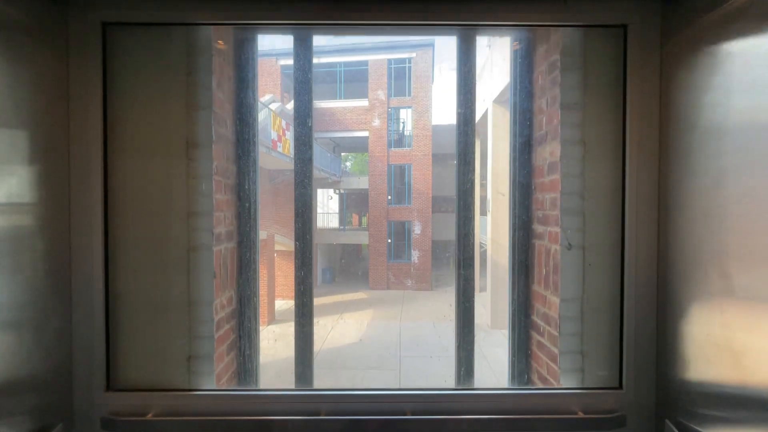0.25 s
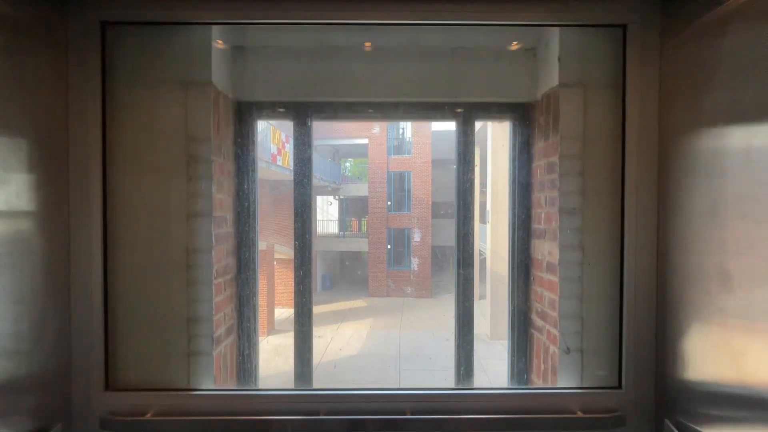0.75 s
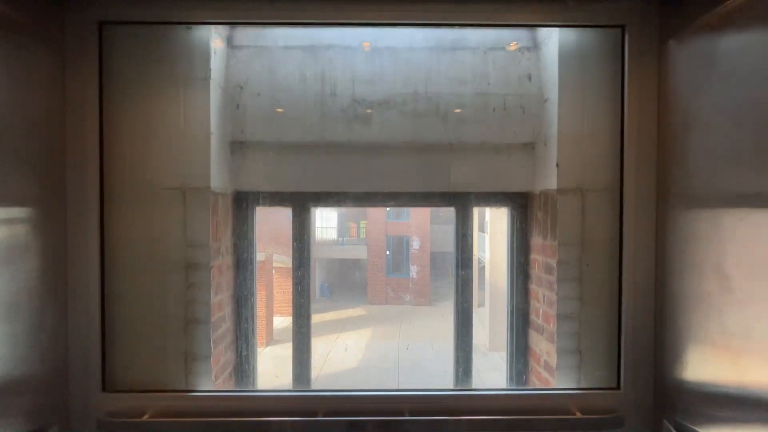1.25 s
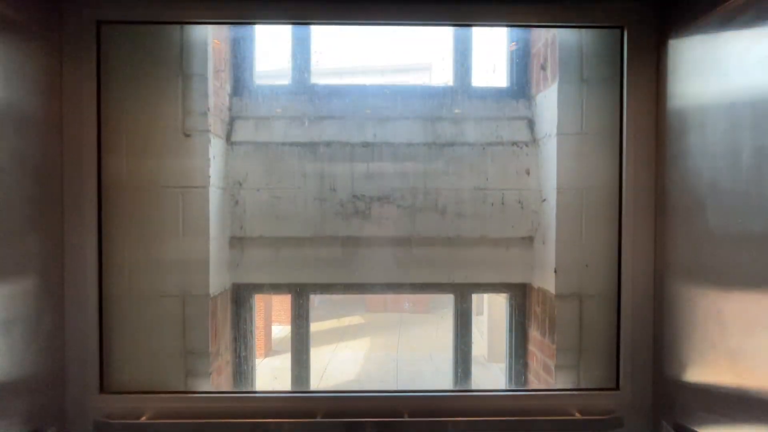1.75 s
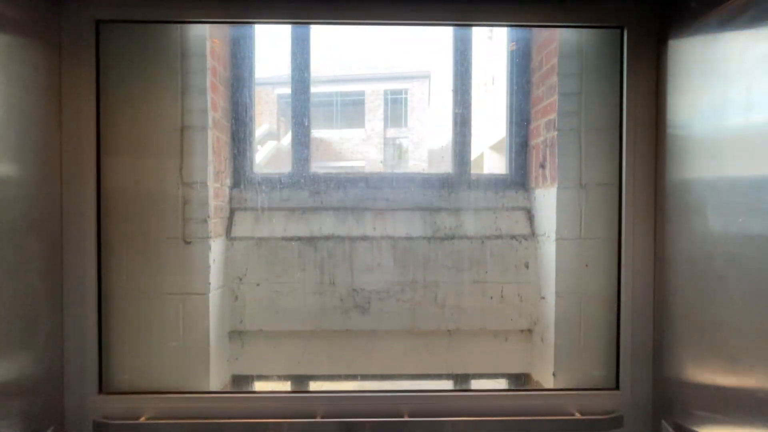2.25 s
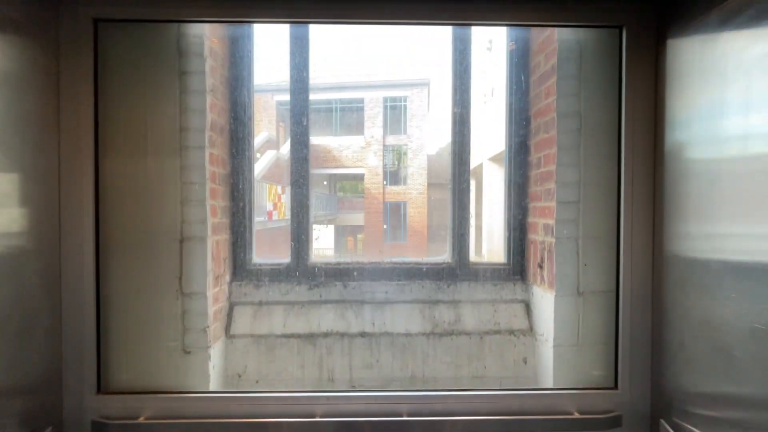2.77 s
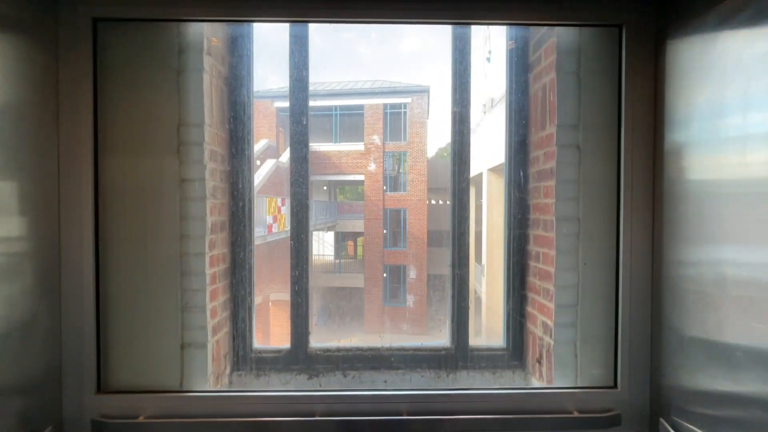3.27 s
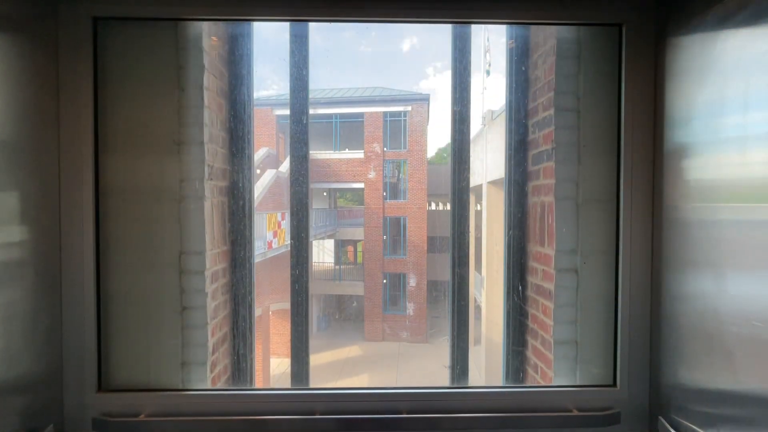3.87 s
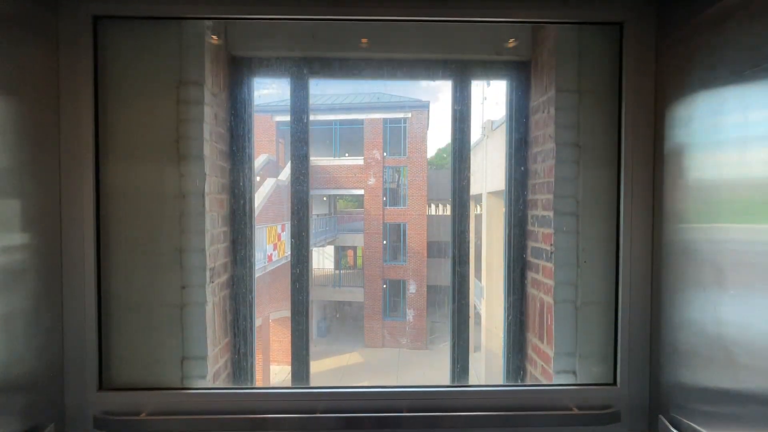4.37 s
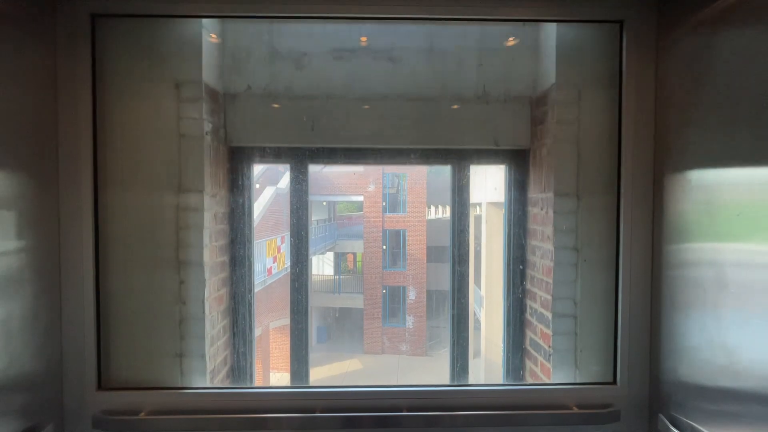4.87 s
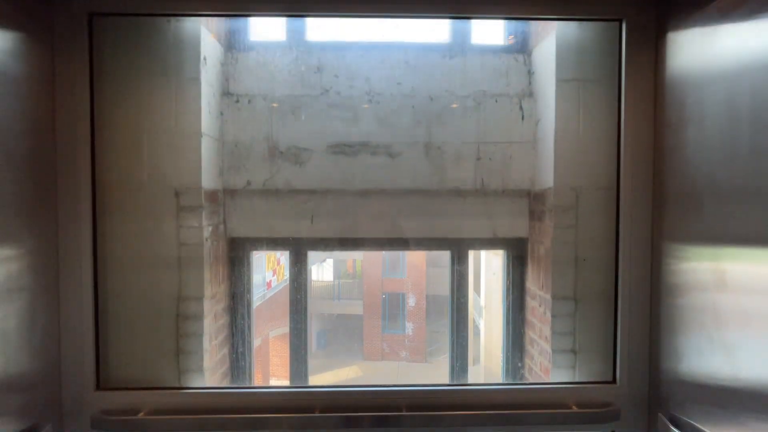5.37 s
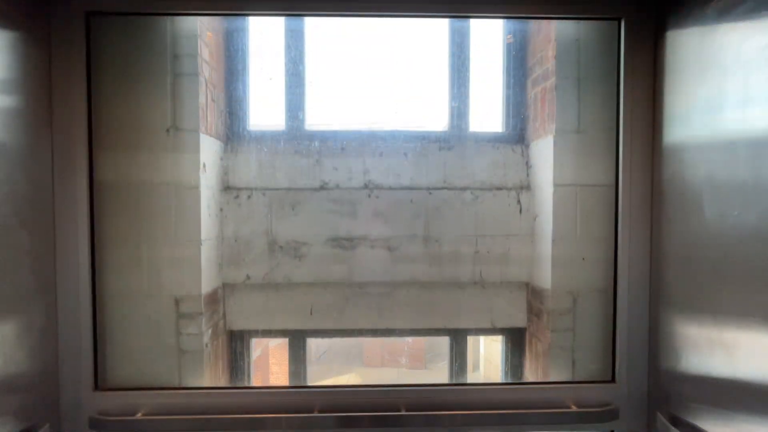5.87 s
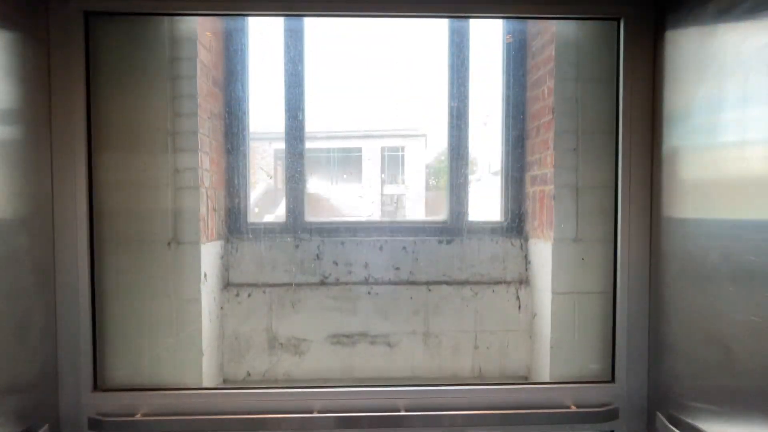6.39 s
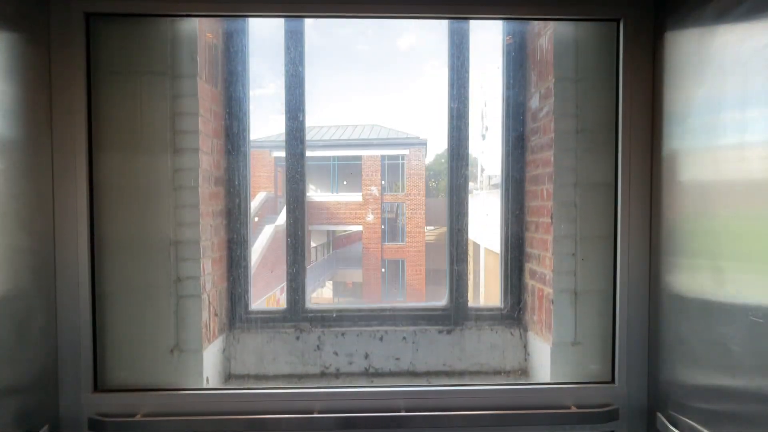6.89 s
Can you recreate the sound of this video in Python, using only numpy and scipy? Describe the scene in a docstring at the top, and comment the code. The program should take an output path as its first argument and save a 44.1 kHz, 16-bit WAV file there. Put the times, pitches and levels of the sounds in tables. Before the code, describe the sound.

From inside a rising lift, a deep rumble with soft, dull booms runs under the roar of the shaft and lightly ringing wall panels. A whir and a pulsing hiss sit on top, flaring briefly a few times and fading as the car climbs. Throughout, the pump's hum swells and recedes without changing pitch, joined by a low drone and faint, thin whistles.

```python
"""Hydraulic lift, going up

Inside the car as it rises through a concrete shaft. The screw pump hums on multiples of one pulse
rate, each swelling and fading as the car climbs through the shaft's standing waves. Under it the frame
drones, the body rumbles with soft booms, the shaft roars and wall panels ring. Faint whistles come and
go; a rasp and a throbbing hiss, perhaps oil rushing through the valve below, thin out with height."""
import sys
import numpy as np
from scipy import signal
from scipy.fft import rfft, irfft, next_fast_len
from scipy.io import wavfile
from scipy.ndimage import uniform_filter1d

SR = 44100
rng = np.random.default_rng(int(sys.argv[2]) if len(sys.argv) > 2 else 0)


def transcribe(u):
    """Save the signal u as a 16-bit wav file named by the first command-line argument.

    u: samples, shape (n,) or (channels, n), limited to [-1, 1]; the rate is SR.
    q: integer samples, one column per channel.
    """
    v = np.clip(np.atleast_2d(u).T, -1, 1)
    q = np.round(v * 32767).astype(np.int16)
    wavfile.write(sys.argv[1], SR, q)


N = 314874

# Stereo image of the noise, left over right: f/Hz, lean/dB
STEREO_LEAN = [(60, -17), (110, 3.5), (200, -2), (360, -0.5), (650, 1), (1170, 4), (2130, 4.5), (3850, 1),
               (6980, 1.5), (12600, -1)]
# Stereo width, side over mid: f/Hz, level/dB
STEREO_WIDTH = [(50, -8), (95, -7.5), (200, -7), (520, -2), (1700, 1.5), (3500, -1), (5200, 1.5),
                (6300, -4), (9250, -3), (9800, 15.5), (10250, 35), (10900, -4.5), (11500, 0.5), (12100, 0)]
# Envelopes of the shaft's dull and middle roar: t/s, level/dB
DULL_LEVEL = [(0.0, -26.5), (0.5, -28.5), (1.0, -26.5), (1.7, -27.5), (2.3, -28), (2.62, -25), (2.9, -29),
              (3.4, -29.5), (3.9, -29.5), (4.4, -30), (5.0, -29), (5.5, -30.5), (6.3, -31), (7.14, -30.5)]
MIDDLE_LEVEL = [(0.0, -30), (0.9, -30), (1.7, -30), (2.7, -31), (3.4, -32.5), (4.1, -34.5), (4.8, -33.5),
                (5.5, -35), (6.4, -33.5), (7.14, -34)]
# Envelopes of the body's rumble and the frame's drone: t/s, level/dB
RUMBLE_LEVEL = [(0.0, -25), (0.7, -28), (0.84, -30), (0.98, -26), (1.8, -29.5), (3.0, -32.5), (4.0, -34.5),
                (5.2, -30.5), (5.8, -29.5), (6.4, -36), (7.14, -34)]
DRONE_LEVEL = [(0.0, -46), (1.2, -40), (1.7, -28.5), (1.99, -31), (2.13, -26.5), (2.7, -31), (2.85, -32),
               (3.05, -29), (3.2, -23), (3.35, -27), (3.7, -22.5), (4.18, -24), (4.3, -31), (4.53, -34.5),
               (5.07, -28.5), (5.57, -35), (6.03, -28.5), (6.36, -32), (6.46, -27.5), (6.8, -28.5),
               (6.93, -23), (7.04, -32), (7.14, -24)]
# Envelopes of the whir and the hiss: t/s, level/dB
WHIR_ENVELOPE = [(0.0, -39), (0.45, -38), (0.8, -36.5), (1.2, -38.5), (1.6, -45), (2.5, -57), (3.5, -48.5),
                 (5.5, -46.5), (7.14, -47.5)]
HISS_LEVEL = [(0.0, -33), (0.24, -36.5), (0.7, -33.5), (1.1, -35.5), (1.35, -35.5), (1.8, -34.5),
              (2.44, -40), (2.84, -38.5), (3.2, -41), (3.78, -48), (4.27, -50), (4.33, -46.5), (4.6, -45.5),
              (5.25, -45), (5.45, -49.5), (5.9, -43.5), (6.72, -44), (6.87, -49.5), (7.14, -47.5)]
# EQ curves of the noise layers: f/Hz, relative level/dB
DULL_EQ = [(25, -21), (60, -13), (130, -1), (150, 0), (250, 2), (450, 2), (520, -3), (800, -1),
           (1200, -39.5)]
MIDDLE_EQ = [(400, -23), (800, 0.5), (1000, 0.5), (1300, -0.5), (1800, -5.5), (2600, -34.5)]
RUMBLE_EQ = [(25, -18), (45, -11), (65, 0.5), (85, 10.5), (102, 12.5), (122, 1), (135, -8), (170, -46)]
RASP_EQ = [(1300, -23), (1900, 3), (2450, 1.5), (3000, -4), (3700, -7.5), (5200, -10), (6500, -6.5),
           (8500, -17.5), (11000, -52), (12000, -50)]
HISS_EQ = [(1500, -3), (2800, 1.5), (3800, 0.5), (4400, 1), (5000, 2.5), (5400, -0.5), (5800, 1.5),
           (6400, 1), (7000, 2), (7300, -1), (8000, -2), (9100, -4.5), (10400, -2), (11200, -6),
           (11700, 0.5), (12400, -18), (12600, -34), (13100, -45)]
# Resonances of wall panels and whir: f/Hz, width/Hz, relative level/dB low in the shaft, same high up
PANEL_MODES = [(173.1, 4.7, -5, -7), (180, 8.5, -16, -18), (378.4, 3, 0, -9.5), (458, 40, -11.5, -10.5),
               (639, 3.2, -21, -11), (739, 10, -11, -7), (756, 5.9, -13.5, -11.5), (816, 38, -26, -21),
               (868, 33, -30, -5), (945, 70, -5.5, -8.5), (1035, 24, -6, -16)]
WHIR_BANDS = [(2210, 90, -8, -1.5), (2415, 220, -0.5, -7), (2640, 79, -6, -7), (2830, 150, -5, -6),
              (2987, 60, -6, -12.5)]
# Soft booms of the car body: centre t/s, level/dB, f/Hz
BOOMS = [(0.1, -22, 106.8), (0.25, -22, 89.8), (0.37, -20.5, 102.7), (0.48, -27, 95), (0.74, -24, 100.8),
         (0.95, -27, 98.6), (1.05, -25.5, 102.2), (1.16, -28, 103), (1.305, -18, 99), (1.48, -24, 104),
         (1.67, -23, 103), (1.97, -25, 100), (2.49, -30, 99), (2.68, -26, 92), (4.17, -28, 100.2),
         (5.01, -28, 100), (5.2, -25, 100), (5.59, -30, 100), (7.0, -30, 97)]
# Faint thin tones: start t/s, length/s, f/Hz, width/Hz, level/dB
WHISTLE_CUES = [(0.2, 0.5, 2240, 20, -48), (1.25, 0.71, 735, 6, -40), (1.9, 0.45, 2215, 20, -46),
                (2.35, 0.95, 814, 9.3, -41), (3.05, 1.15, 760, 6, -42), (3.05, 0.4, 730, 6, -41),
                (5.95, 1.3, 2216, 35, -52), (6.0, 1.0, 900, 30, -44.5), (6.35, 0.4, 3015, 15, -56)]
# Uneven groove of the hiss's throb: t/s, depth/dB, lead/beats
THROB_GROOVE = [(0.0, 1.5, 0.16), (0.7, 3, -0.026), (1.2, 0.5, -.15), (1.9, 1.8, -0.07), (2.4, 2.8, -0.083),
                (2.6, 1.0, -0.12), (2.75, 3, -0.49), (3.2, 1, -.6), (3.5, 0, -0.29), (4.0, 3.5, -0.15),
                (5.2, -0.5, -0.041), (5.7, 2, -0.18), (6.6, 1.3, -0.066), (7.14, 1.8, 0.17)]
# Flares of the hiss: start t/s, hold/s, rise/dB
FLARES = [(0.693, 0.031, 3.5), (1.437, 0.085, 6), (2.29, 0.049, 3), (2.511, 0.13, 5), (3.137, 0.05, 3.5),
          (3.453, 0.075, 4), (4.312, 0.15, 4)]
# Pump hum at the pulse rate and at twice that: t/s, level/dB
PUMP_FUNDAMENTAL = [(0.0, -30), (0.54, -53), (1.1, -36), (1.55, -30), (2.4, -40), (2.9, -48), (3.2, -41),
                    (3.75, -35), (3.95, -46), (4.2, -36), (4.6, -38), (4.85, -30.5), (5.3, -33), (5.7, -36),
                    (6.1, -46), (6.3, -36), (6.55, -43), (7.14, -48)]
PUMP_2ND = [(0.0, -40.5), (0.48, -36), (0.75, -38), (1.45, -41.5), (1.75, -33), (2.45, -32.5), (2.68, -29),
            (2.83, -32.5), (3.1, -29.5), (3.22, -39.5), (3.56, -30), (3.7, -38), (3.82, -31.5), (3.98, -39),
            (4.47, -30.5), (4.93, -40), (5.6, -44), (5.72, -31), (5.83, -40), (6.24, -26.5), (6.45, -23.5),
            (6.75, -24), (6.85, -29.5), (6.93, -26.5), (7.14, -29.5)]
# Its 3rd harmonic: t/s, level/dB, left over right/dB
PUMP_3RD = [(0.0, -41, 1), (0.18, -33, -6), (0.42, -40.5, 14), (0.64, -24, 6), (0.82, -39, 11),
            (1.05, -30.5, 10), (1.3, -27, 9.5), (1.62, -38, 19), (2.08, -38.5, 6), (2.26, -35.5, -6),
            (2.5, -46, 9), (2.6, -30, 10), (2.7, -42, 11), (2.9, -36, 14), (3.0, -47, 24), (3.5, -36, 17),
            (3.68, -42.5, 13), (3.95, -41, 21), (4.18, -43.5, -1), (4.6, -32.5, -1), (5.25, -27.5, 5),
            (5.5, -24, 7), (5.8, -27, 4.5), (6.08, -35.5, 4), (6.4, -25, 3), (6.65, -34, 4), (6.88, -34, 0),
            (7.14, -31.5, -1)]
# Its faint upper harmonics: t/s, 4th level/dB, 5th level/dB
PUMP_4TH_5TH = [(0.0, -50, -50), (0.45, -48, -56), (0.75, -53, -43), (1.5, -45, -48), (2.1, -40.5, -44.5),
                (2.55, -43, -46), (2.85, -39, -43), (3.15, -40, -38.5), (3.75, -44, -42), (4.05, -49, -42),
                (4.35, -49, -50), (4.8, -51, -38.5), (5.25, -57, -52.5), (6.15, -44.5, -42),
                (7.14, -45, -48.5)]

TIME = np.arange(N) / SR


def from_db(db):
    """Decibels to gain."""
    return 10 ** (np.asarray(db) / 20)


def rms_one(x):
    """Scale to unit rms."""
    return x / np.sqrt(np.mean(x ** 2) + 1e-20)


def in_time(rows):
    """Columns of an envelope table, one value per sample."""
    times, *columns = np.transpose(rows)
    return [np.interp(TIME, times, column) for column in columns]


def at_hz(points, hz):
    """Read a curve on a log-frequency axis."""
    points_hz, values = np.transpose(points)
    return np.interp(np.log(hz), np.log(points_hz), values)


def swells(rows):
    """Sum of attack-hold-release envelopes."""
    return sum(np.interp(TIME, np.cumsum([start_s, attack_s, hold_s, release_s]), [0, peak, peak, 0])
               for start_s, attack_s, hold_s, release_s, peak in rows)


def drift(rate_hz):
    """Random modulation: noise through a double one-pole low-pass, rms 1."""
    hop, settle = 40, 2000
    pole = np.exp(-2 * np.pi * rate_hz * hop / SR)
    noise = rng.standard_normal(N // hop + settle + 2)
    slow = signal.lfilter([1], [1, -2 * pole, pole * pole], noise)[settle:]
    return np.interp(np.arange(N) / hop, np.arange(len(slow)), rms_one(slow))


def pan(lean_db):
    """Left and right gains for a level difference."""
    return from_db(np.multiply.outer([.5, -.5], lean_db))


def tone(hz, rms, lead, waver):
    """Stereo sine with a wavering phase, left ahead of right; lead and waver in radians."""
    phase = 2 * np.pi * hz * TIME + waver * drift(3.2) + rng.uniform(0, 2 * np.pi)
    return np.sqrt(2) * rms * np.sin(phase + np.multiply.outer([.5, -.5], lead * np.ones(N)))


def diffuse(gain_at):
    """Wide stereo noise shaped by gain_at(hz), rms 1."""
    size = next_fast_len(N)
    hz = np.maximum(np.arange(size // 2 + 1) * SR / size, 1)
    mid, side = rfft(rng.standard_normal((2, size)))
    width = from_db(at_hz(STEREO_WIDTH, hz))
    pair = (mid + width * side * [[1], [-1]]) / np.sqrt(1 + width ** 2)
    spectrum = pair * gain_at(hz) * pan(at_hz(STEREO_LEAN, hz))
    return rms_one(irfft(spectrum, size)[:, :N])


def rush(eq):
    """Diffuse noise through an EQ curve."""
    return diffuse(lambda hz: from_db(at_hz(eq, hz)))


def resonances(peaks):
    """Diffuse noise through narrow peaks."""
    def gain_at(hz):
        return np.sqrt(sum(from_db(2 * level_db) / width / (1 + (2 * (hz - centre_hz) / width) ** 2) ** 2
                           for centre_hz, width, level_db in peaks))
    return diffuse(gain_at)


def climbing(bands):
    """Resonances that crossfade from one balance to another as the car climbs."""
    height = np.arange(N) / N
    low = resonances([(hz, width, low_db) for hz, width, low_db, _ in bands])
    high = resonances([(hz, width, high_db) for hz, width, _, high_db in bands])
    return np.sqrt(1 - height) * low + np.sqrt(height) * high


def evened(x, span_s):
    """Compress the chance swells of a narrow noise, so its envelope does the shaping."""
    power = uniform_filter1d(np.mean(x ** 2, axis=0), round(span_s * SR))
    return rms_one(x / np.sqrt(power + .12 * np.mean(power)))


def shaft_roar():
    """A bed of dull and middle shaft noise; the wall panels ring along with the middle band."""
    middle = from_db(0.5 * drift(3.4)) * rush(MIDDLE_EQ)
    panels = from_db(-1.5) * climbing(PANEL_MODES)
    dull = from_db(in_time(DULL_LEVEL)[0]) * rush(DULL_EQ)
    return dull + from_db(in_time(MIDDLE_LEVEL)[0]) * (middle + panels)


def body_rumble(half_boom_s=0.037, flicker_db=1.6):
    """Deep uneven noise of the car body; at each soft jolt it ducks under one low, booming note."""
    booms, duck = np.zeros((2, N))
    for centre_s, boom_db, hz in BOOMS:
        near = slice(*np.searchsorted(TIME, [centre_s - half_boom_s, centre_s + half_boom_s]))
        swell = np.cos(np.pi / 2 * (TIME[near] - centre_s) / half_boom_s)
        note = np.sin(2 * np.pi * hz * TIME[near] + rng.uniform(0, 2 * np.pi))
        booms[near] += np.sqrt(2) * from_db(boom_db) * swell * note
        duck[near] = np.maximum(duck[near], swell ** 2)
    level_db = in_time(RUMBLE_LEVEL)[0] + flicker_db * drift(12.0)
    return booms + (1 - duck) * from_db(level_db) * evened(rush(RUMBLE_EQ), span_s=0.087)


def frame_drone(mode_hz=52.9):
    """The car frame hums at its lowest mode, with a slight flutter."""
    level_db = in_time(DRONE_LEVEL)[0] + 1.2 * drift(10.0)
    return tone(mode_hz, from_db(level_db), lead=0.19, waver=0.24)


def whistles(fade_s=0.13):
    """Thin bands of noise, independent left and right, fading in and out."""
    mix = np.zeros((2, N))
    for start_s, length_s, hz, width_hz, level_db in WHISTLE_CUES:
        phase = 2 * np.pi * hz * TIME
        band = [drift(width_hz) * np.sin(phase) + drift(width_hz) * np.cos(phase) for side in "LR"]
        envelope = swells([(start_s, fade_s, length_s - fade_s, fade_s, from_db(level_db))])
        mix += envelope * pan(at_hz(STEREO_LEAN, hz))[:, None] * band
    return mix


def rasp(base_db=-35, hiss_follow=0.41, fade_db_per_s=0.52):
    """A bright band that fades with the hiss and with height, plus a whir loudest low in the shaft."""
    hiss_db = in_time(HISS_LEVEL)[0]
    level_db = base_db + hiss_follow * (hiss_db - hiss_db.mean()) - fade_db_per_s * TIME
    band = from_db(level_db + 1.08 * drift(9.0)) * rush(RASP_EQ)
    whir = from_db(in_time(WHIR_ENVELOPE)[0] + 2.1 * drift(13.0)) * climbing(WHIR_BANDS)
    return band + whir


def throb(base_hz=9.0, sag_hz_per_s=.08, offset_s=.076, accent_db=1.0):
    """The hiss's pulsing in dB: slowing, as if with a turning roller, every third beat accented."""
    t = TIME - offset_s
    depth_db, lead = in_time(THROB_GROOVE)
    beats = base_hz * t - sag_hz_per_s * t ** 2 / 2 + lead
    return depth_db * np.cos(2 * np.pi * beats) + accent_db * np.cos(2 * np.pi * (beats - 1) / 3)


def hiss(attack_s=0.0061, release_s=0.018, treble_hz=7500, treble_db_per_db=0.045):
    """Perhaps oil in the valve: flares drown the throb; the treble flickers and lifts when loud."""
    flare_db = swells([(start_s, attack_s, hold_s, release_s, db) for start_s, hold_s, db in FLARES])
    throb_db = throb() * (1 - flare_db / flare_db.max())
    level_db = in_time(HISS_LEVEL)[0] + throb_db + flare_db + .4 * drift(14.0)
    noise = rush(HISS_EQ)
    treble = signal.sosfiltfilt(signal.butter(2, treble_hz, "high", fs=SR, output="sos"), noise)
    treble_db = treble_db_per_db * (level_db - level_db.mean()) + 2.0 * drift(17.0)
    return from_db(level_db) * (noise - treble + from_db(treble_db) * treble)


def pump_hum(pulse_hz=117.36):
    """The screw pump's pressure pulses; standing waves give each harmonic its level at each height."""
    hum = tone(pulse_hz, from_db(in_time(PUMP_FUNDAMENTAL)[0]), lead=0.51, waver=0.066)
    second_db = in_time(PUMP_2ND)[0] + 0.5 * drift(7.2)
    hum += tone(2 * pulse_hz, from_db(second_db), lead=0.19, waver=.15)
    third_db, lean_db = in_time(PUMP_3RD)
    hum += tone(3 * pulse_hz, from_db(third_db) * pan(lean_db), lead=0.25, waver=.15)
    for harmonic, level_db in zip((4, 5), in_time(PUMP_4TH_5TH)):
        hum += tone(harmonic * pulse_hz, from_db(level_db + drift(3)), lead=.8 + .8 * drift(.4), waver=.5)
    return hum


def scene():
    """The full mix inside the car."""
    return pump_hum() + frame_drone() + body_rumble() + shaft_roar() + rasp() + whistles() + hiss()


def record(dry):
    """A steep high cut on the mix."""
    stop_hz, run_in = 13254, 200
    high_cut = signal.cheby2(12, 70, stop_hz, fs=SR, output="sos")
    padded = np.pad(dry, ((0, 0), (run_in, 0)), "reflect")
    return signal.sosfilt(high_cut, padded)[:, run_in:]


dry = scene()
out = record(dry)
transcribe(out)
```